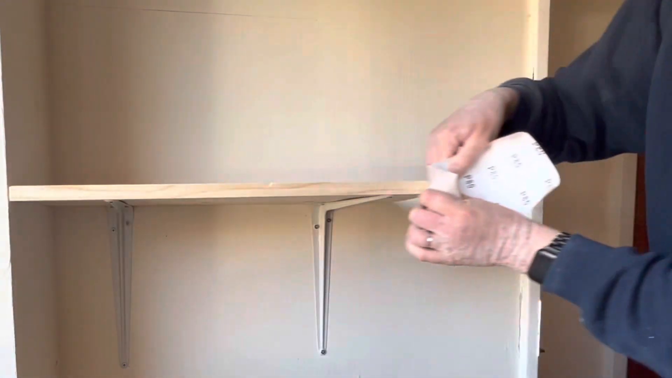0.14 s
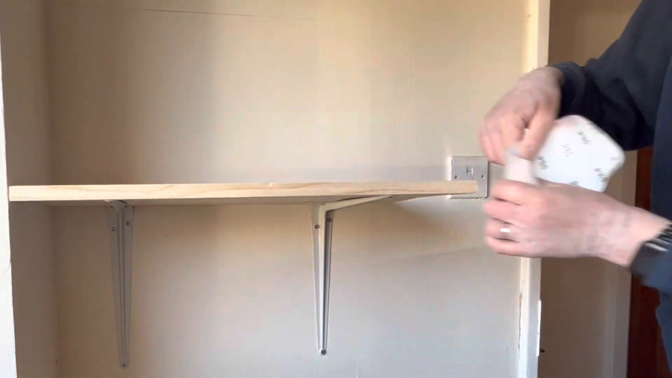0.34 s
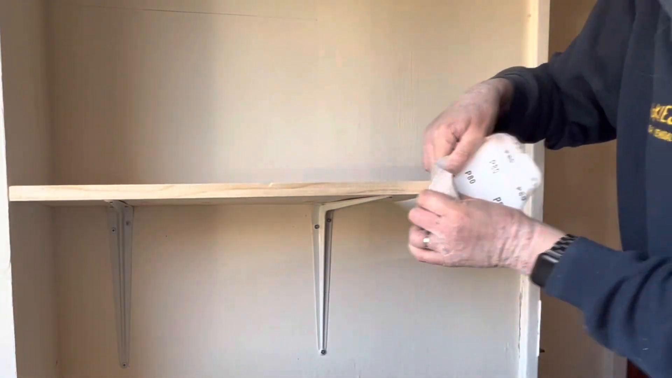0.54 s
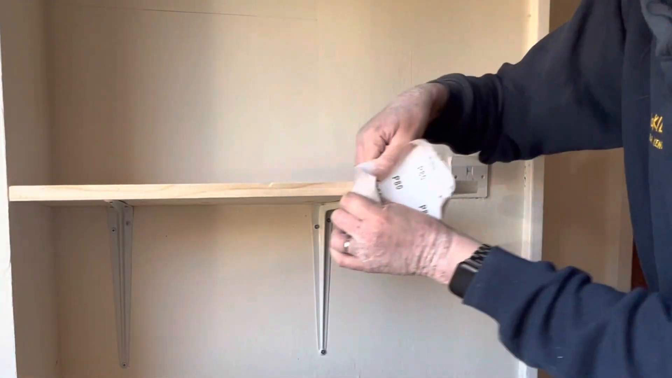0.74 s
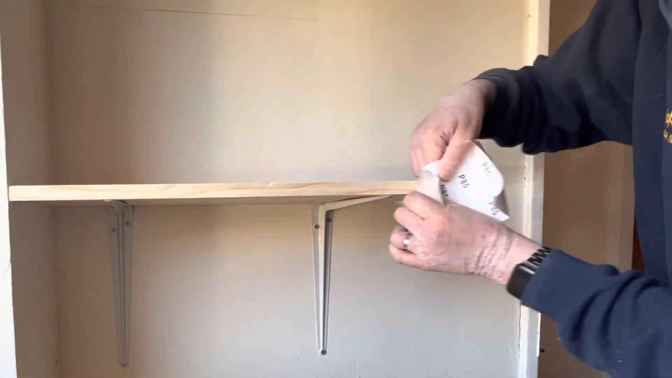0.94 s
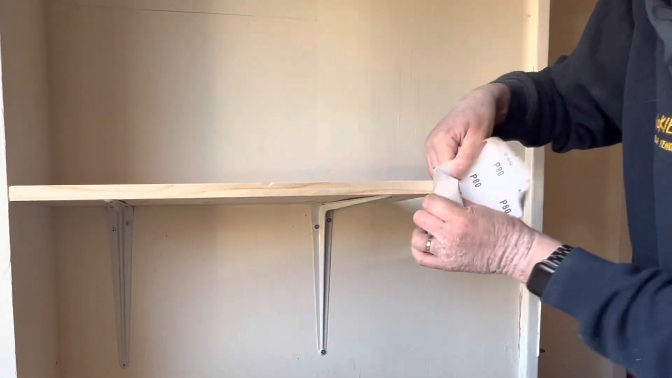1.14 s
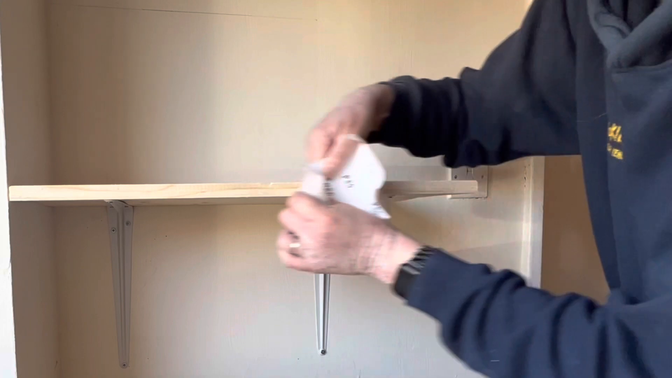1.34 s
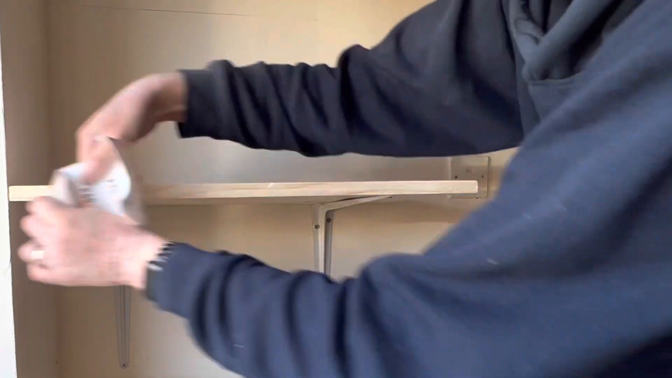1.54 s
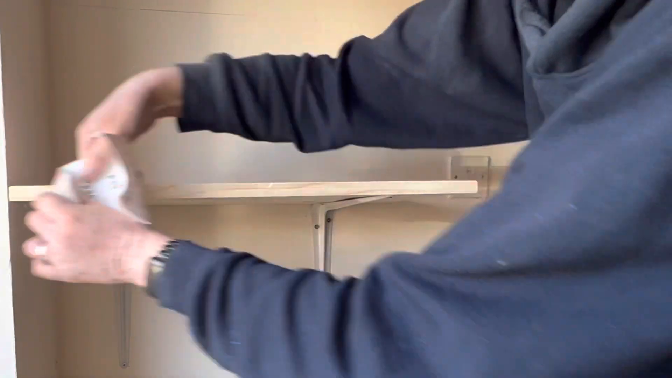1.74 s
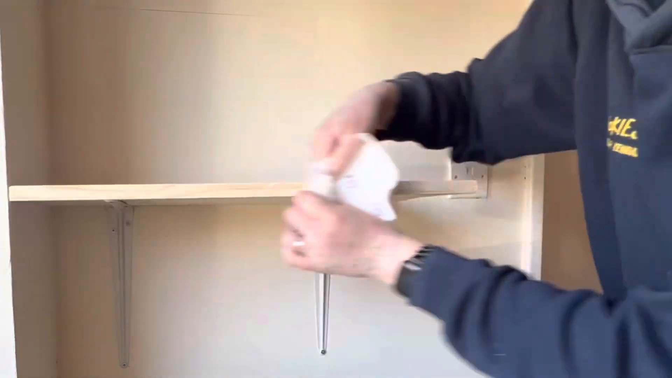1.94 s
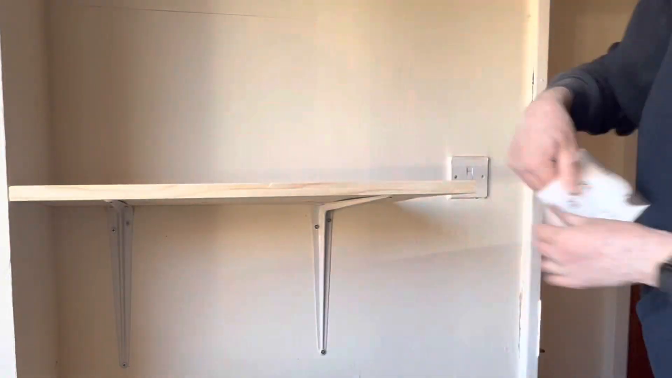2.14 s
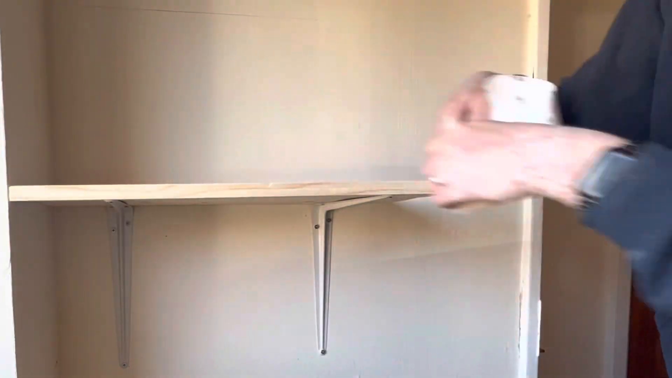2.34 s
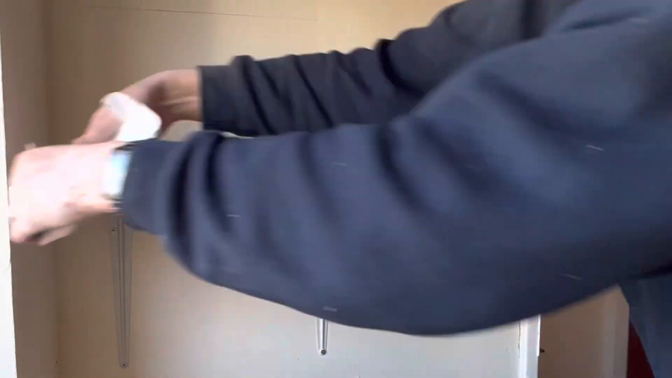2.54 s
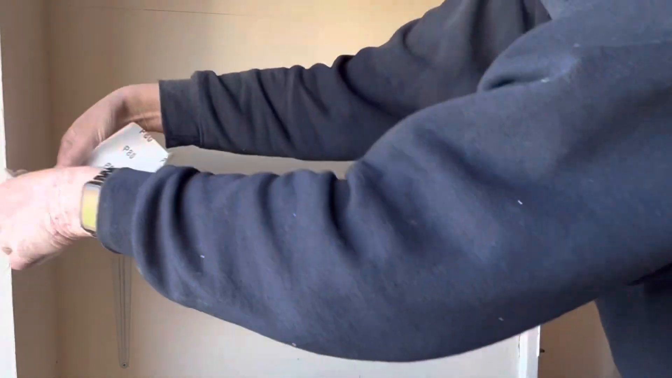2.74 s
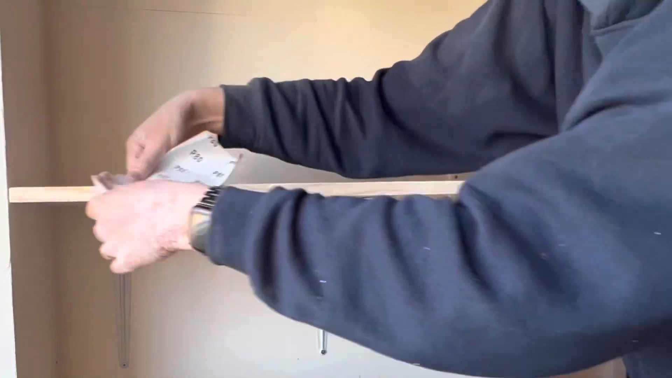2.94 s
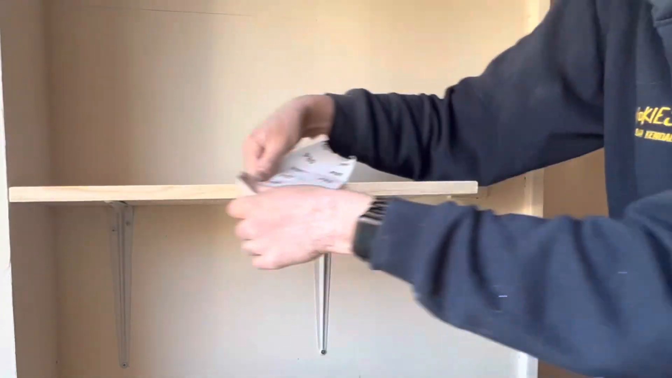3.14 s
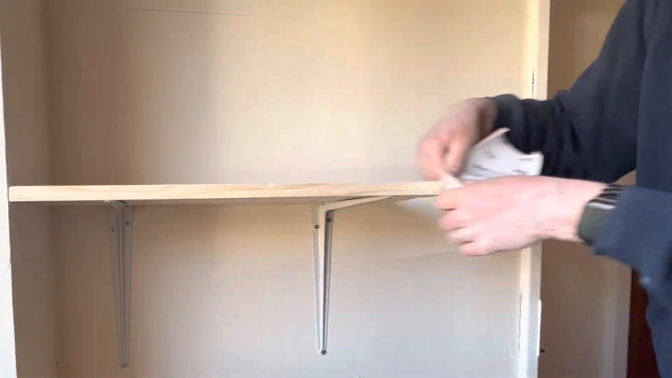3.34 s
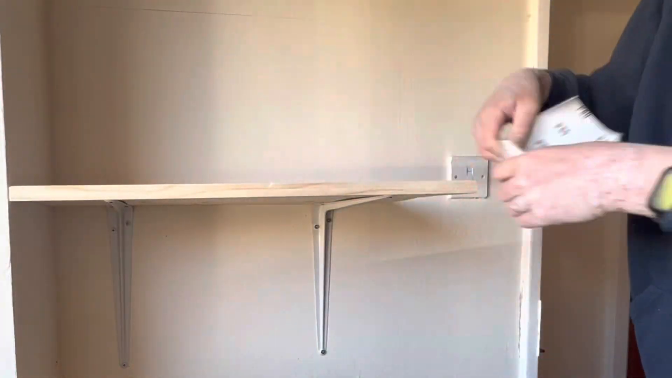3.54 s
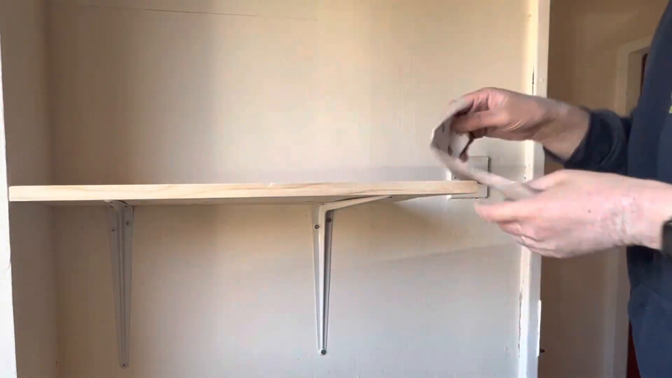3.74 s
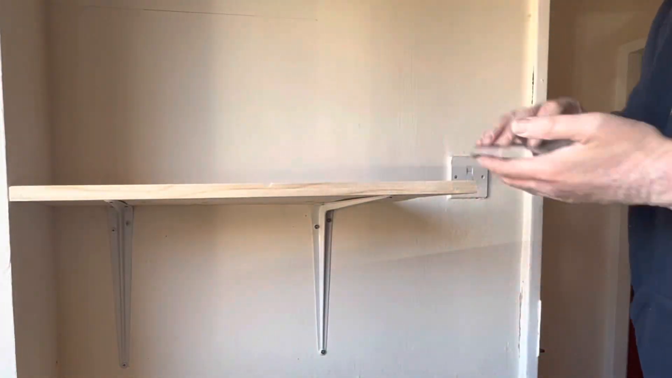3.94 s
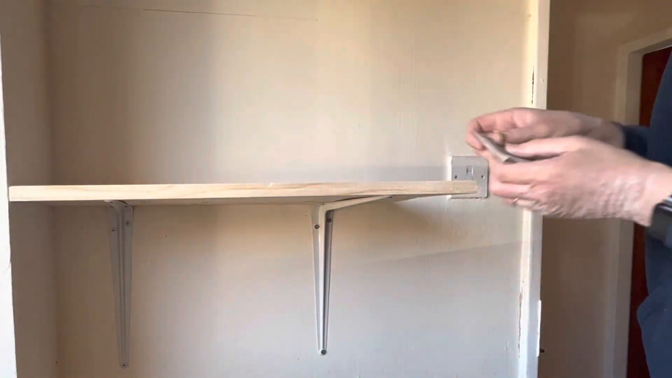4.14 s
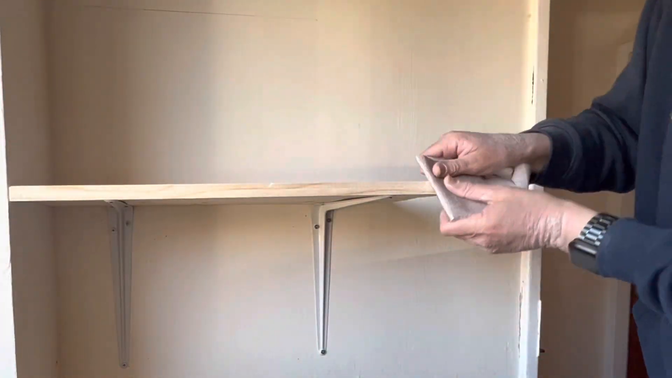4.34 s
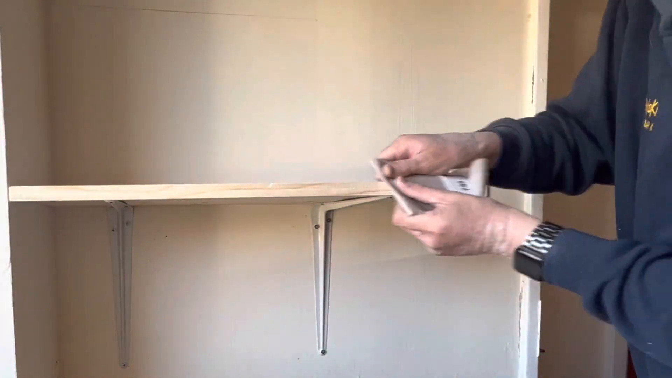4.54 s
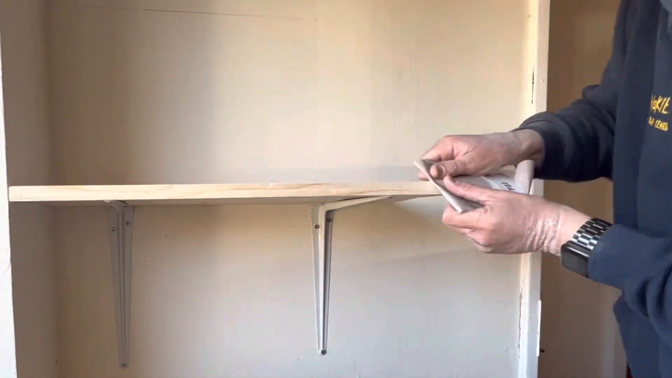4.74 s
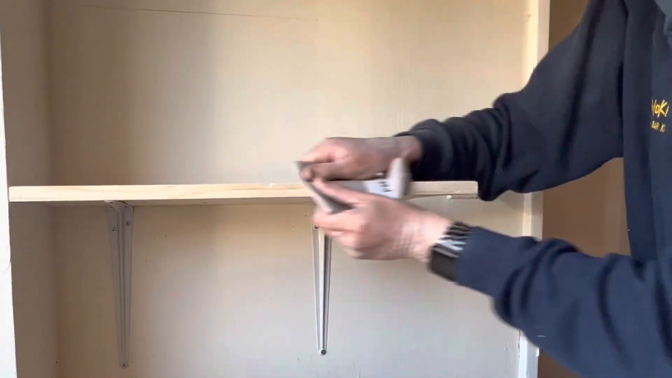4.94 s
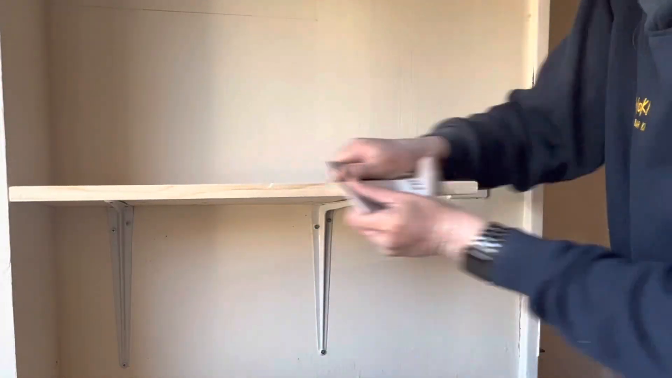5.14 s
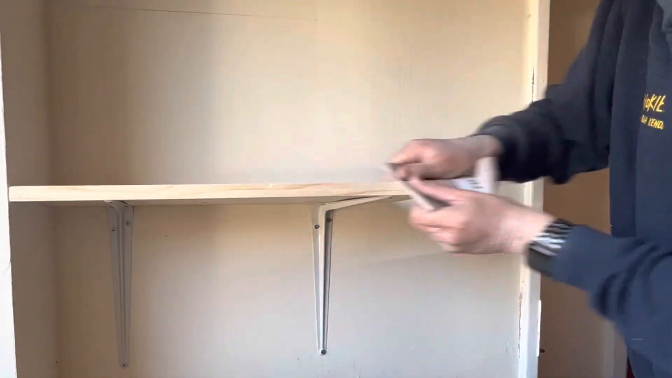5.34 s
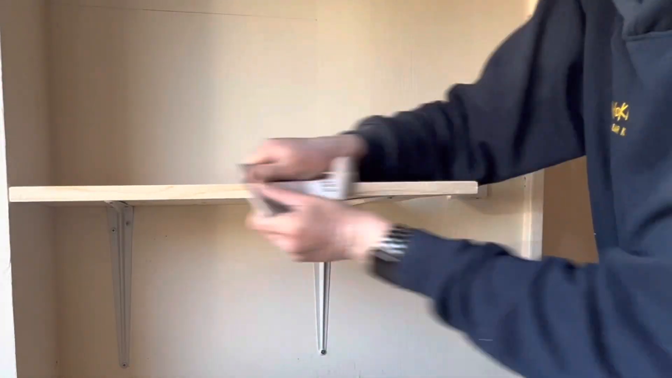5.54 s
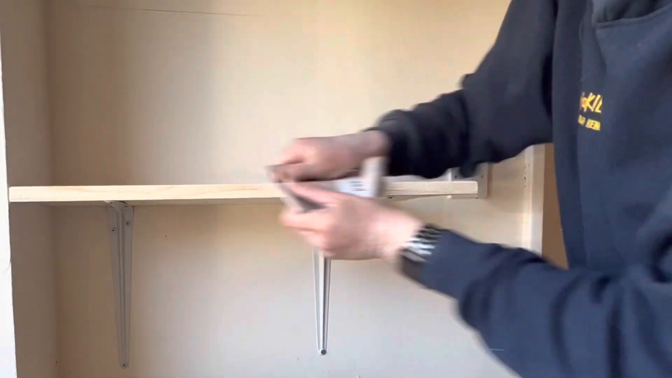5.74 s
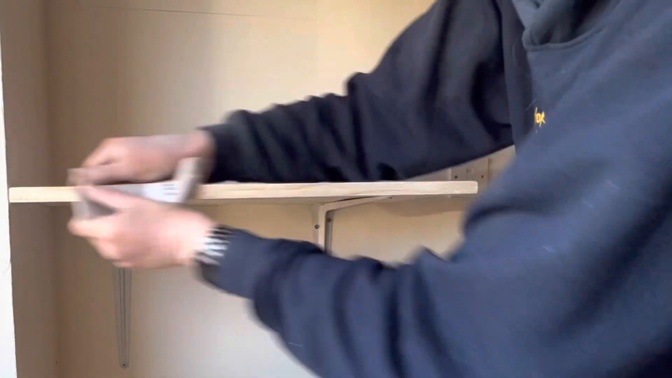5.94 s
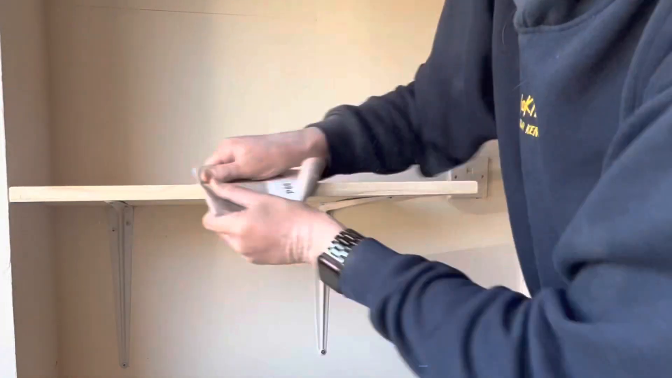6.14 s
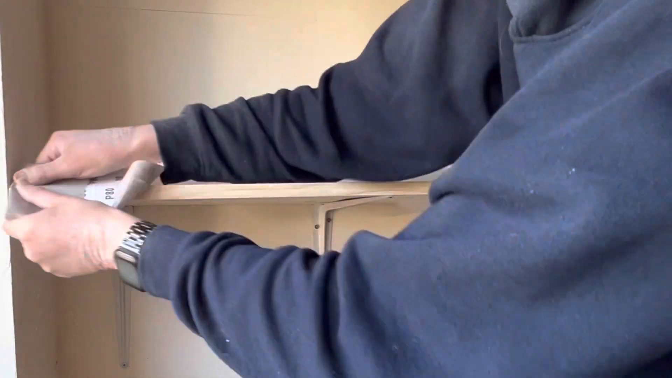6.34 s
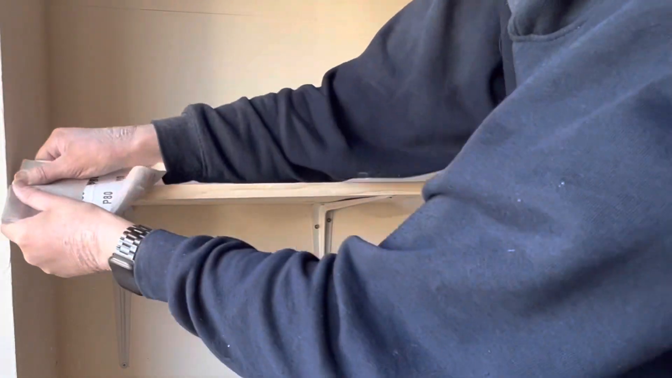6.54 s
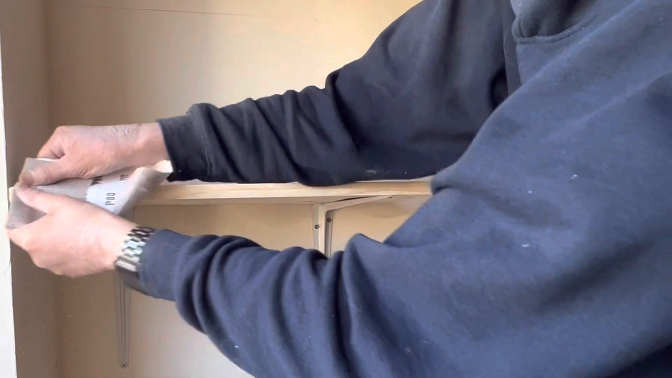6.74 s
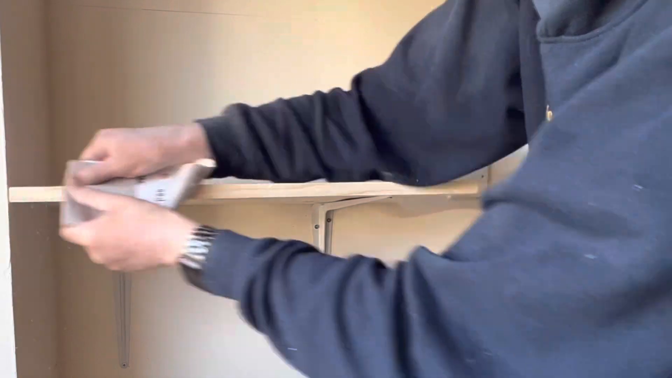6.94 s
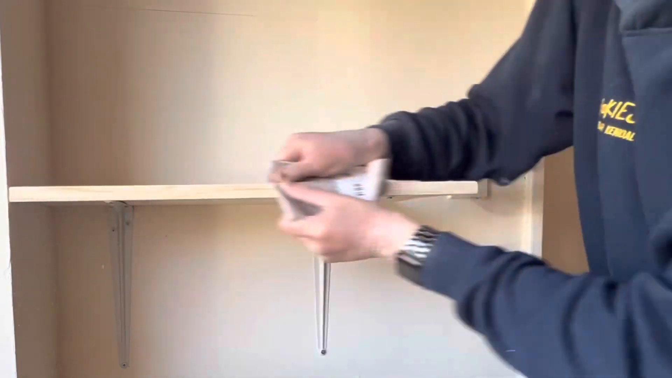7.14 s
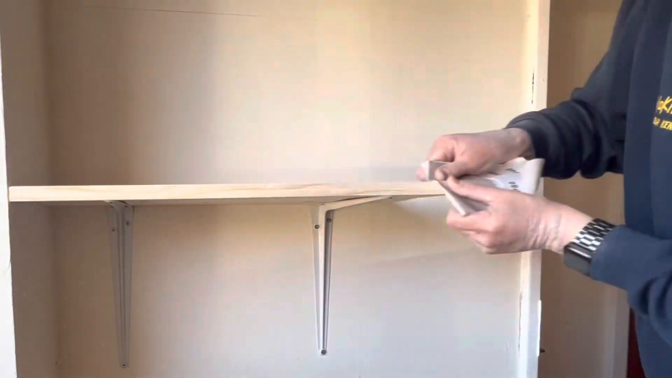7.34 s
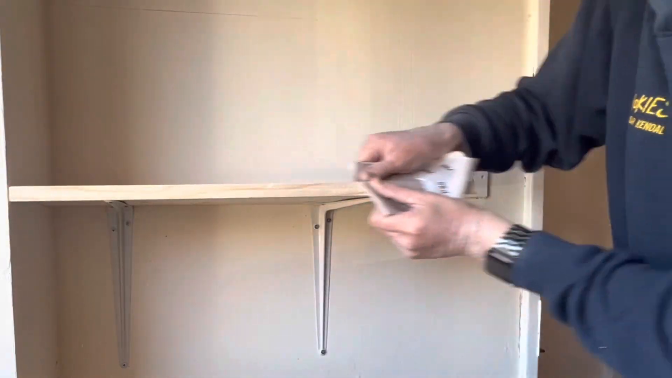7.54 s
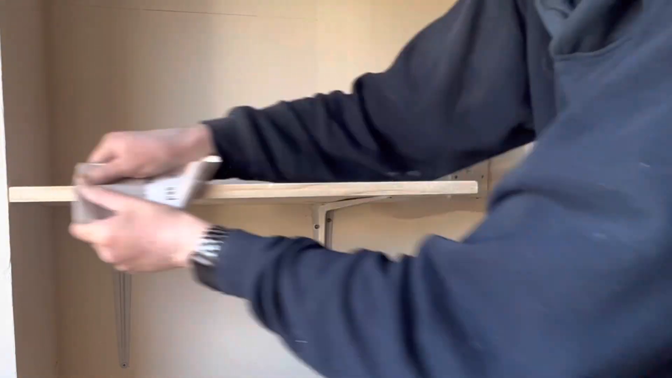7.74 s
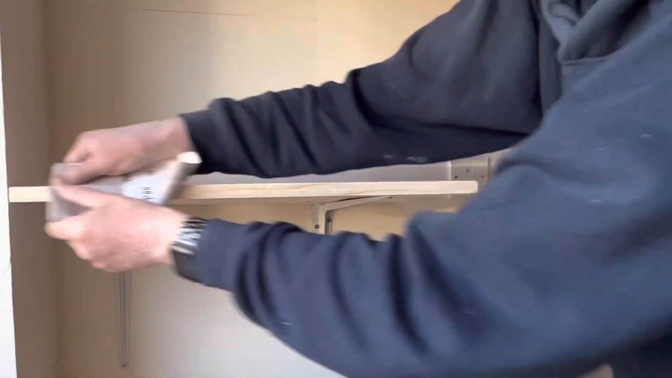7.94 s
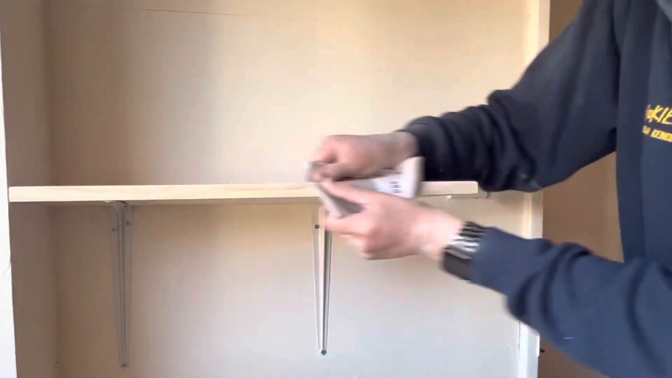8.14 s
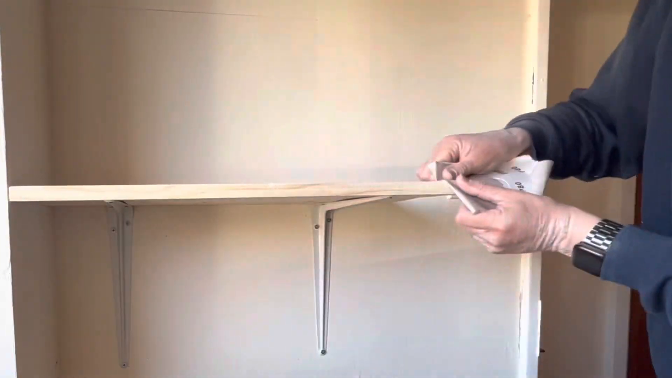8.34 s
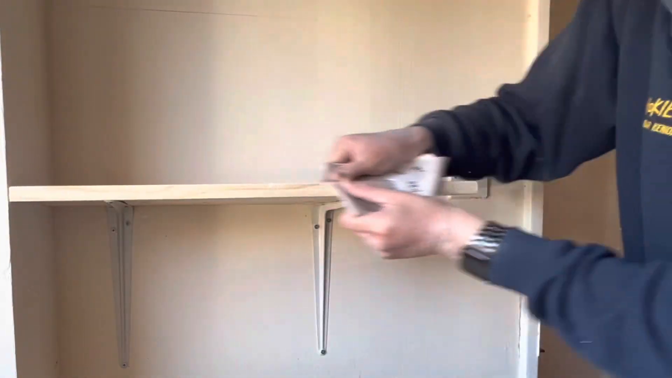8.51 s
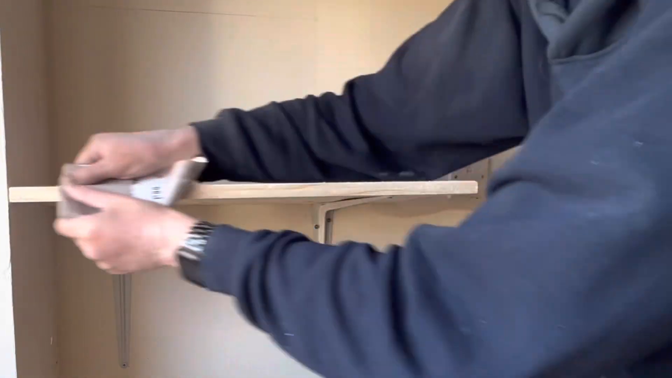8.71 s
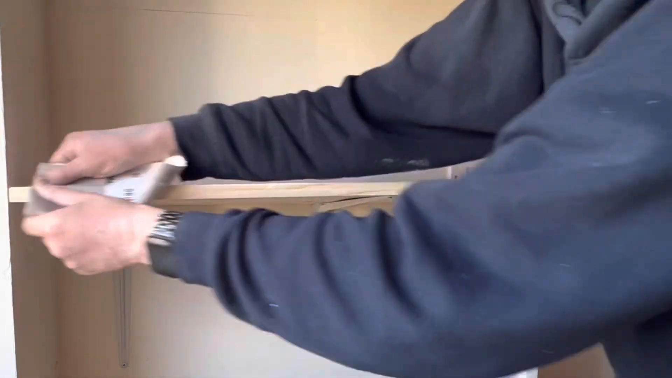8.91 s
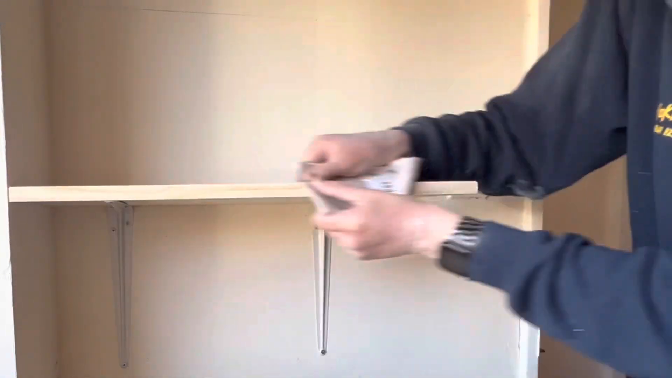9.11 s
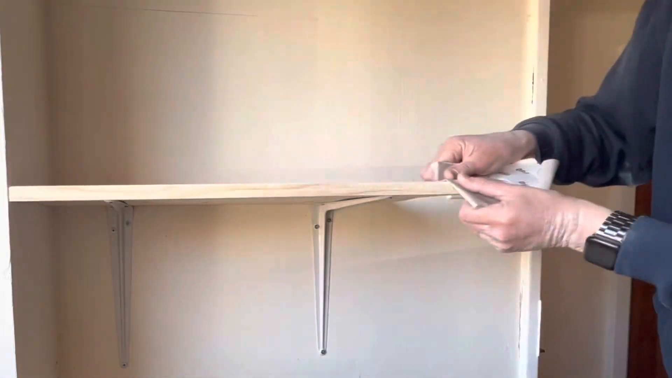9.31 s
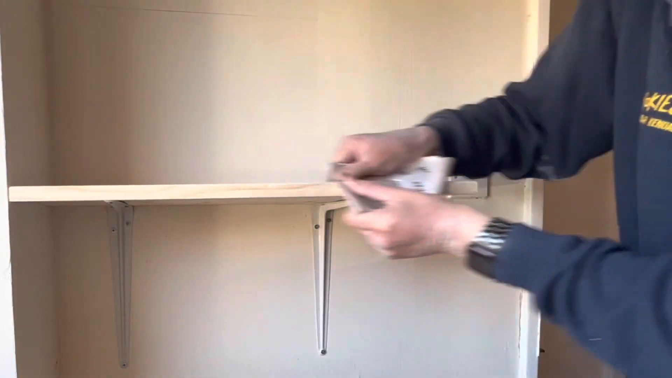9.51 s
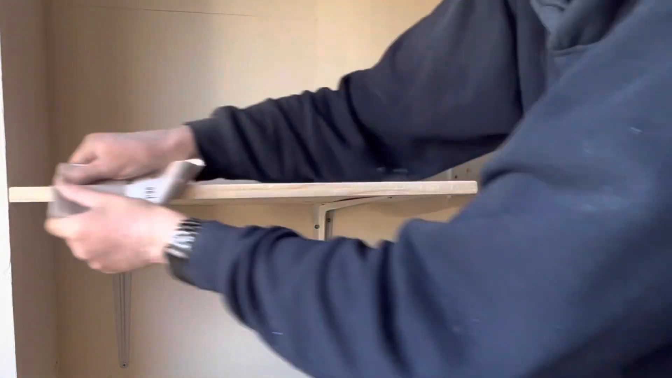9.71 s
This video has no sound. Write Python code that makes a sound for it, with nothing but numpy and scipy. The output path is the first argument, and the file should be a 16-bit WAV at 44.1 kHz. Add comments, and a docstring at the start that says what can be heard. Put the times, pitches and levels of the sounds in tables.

```python
"""In an alcove, a metre from a phone, sandpaper wrapped round the edge of a pine shelf is drawn to and fro by hand.
Scratches are noise grains, heard straight and through resonances of fold, shelf edge and drumming board.
Fingers and folds knock the board by short pushes; a steel bracket rings as decaying sines where the sheet snaps off.
Between strokes the loose sheet rustles in bands of crackle. Behind lie filtered room tone, a swaying low rumble
and the close walls' short echo; two microphone ports colour it all."""
import sys
import numpy as np
from scipy import signal
from scipy.fft import rfft, irfft, next_fast_len
from scipy.io import wavfile
from scipy.ndimage import uniform_filter1d

SR = 44100
rng = np.random.default_rng(int(sys.argv[2]) if len(sys.argv) > 2 else 0)


def wav_out(sig):
    """Save sig, one row per channel (or a flat mono array), as 16-bit PCM at SR to the path in sys.argv[1]."""
    wavfile.write(sys.argv[1], SR, np.round(np.clip(np.atleast_2d(sig).T, -1, 1) * 32767).astype(np.int16))


N = 430857

# Spectrum of grit on pine, for scratches and cracks. Each row: frequency in Hz, relative level in dB.
SCRATCH_SPECTRUM = [(290, -58), (500, -53), (1030, -3.5), (1200, -12), (1270, -6), (2230, 1.5), (3740, 0),
                    (4070, -2), (9930, -4), (14200, -6), (15500, -5)]
# Resonances of the board, the last one broad. Each row: frequency in Hz, width in Hz, relative gain in dB.
BOARD_MODES = [(127.8, 5.2, -13.5), (229, 12.8, -6), (274.4, 31, -3.5), (329, 52, -2), (394.2, 20.7, 4.5),
               (750, 1060, -13.5)]
# Resonances of the hollow in the folded sheet. Each row: frequency in Hz, width in Hz, relative gain in dB.
FOLD_MODES = [(840, 182, 7.5), (1270, 10, -3)]
# Rustles of the loose sheet. Each row: start in seconds, length in seconds, level in dB,
# crinkle pitch in Hz, crinkle level above the rustle in dB.
RUSTLE_TIMES = [(0.354, 0.056, -50, 2000, -5), (0.433, 0.035, -42, 2210, -1), (2.143, 0.14, -46, 890, -18),
                (2.24, 0.12, -50, 2500, -23), (2.29, 0.053, -47, 2980, -12), (2.42, 0.16, -53, 800, -3),
                (2.495, 0.12, -40.5, 2190, -17), (3.514, 0.098, -41.5, 3600, -20),
                (3.598, 0.071, -35.5, 3430, -8), (3.674, 0.19, -40, 4800, -11),
                (3.815, 0.092, -36.5, 1750, -9), (3.887, 0.1, -39, 2520, -12), (3.968, 0.18, -38, 4740, -5),
                (4.13, 0.098, -34, 2580, -15), (4.215, 0.14, -41.5, 900, -16),
                (7.39, 0.049, -43, 1500, -12)]


def undb(db):
    """Amplitude factor of a level in dB."""
    return 10 ** (np.asarray(db) / 20)


def level(x, db):
    """Scale a signal to an RMS level in dB."""
    return x * undb(db) / np.sqrt(np.mean(x ** 2))


def high_pass(x, order, hz):
    """Butterworth high-pass."""
    return signal.sosfilt(signal.butter(order, hz, "high", fs=SR, output="sos"), x)


def curves(rows):
    """Columns of a time table, one value a sample."""
    s, *columns = np.transpose(rows)
    return [np.interp(np.arange(N) / SR, s, column) for column in columns]


def colour(x, points, scale=1):
    """Filter by (Hz, dB) points joined along log frequency; scale multiplies the dB."""
    size = next_fast_len(N)
    hz, db = np.transpose(points)
    f = np.arange(size // 2 + 1) * SR / size + 1  # 1 Hz up, to keep the log finite
    gain = undb(scale * np.interp(np.log(f), np.log(hz), db))
    return irfft(rfft(x, size) * gain, size)[..., :N]


def walk(rate):
    """Random levels joined by slopes of 1 / rate s; spread a little below 1."""
    k = int(SR / rate)
    steps = np.repeat(rng.standard_normal(N // k + 1), k)
    return uniform_filter1d(steps, k)[:N]


def ring(x, modes, flicker_db=0.0):
    """Parallel resonances, neighbours in opposite phase; each may flicker, as when the contact moves."""
    out = 0
    for k, (hz, width, db) in enumerate(modes):
        gain = (-1) ** k * undb(db + flicker_db * walk(12))
        out = out + gain * signal.lfilter(*signal.iirpeak(hz, hz / width, SR), x)
    return out


def grit(scatter_db, channels):
    """Countless grain scratches of uneven size: noise with a random gain on each sample."""
    size_db = scatter_db * np.minimum(rng.exponential(size=(channels, N)), 5.0)
    return level(rng.standard_normal((channels, N)) * undb(size_db), 0)


def pair(x, alike_hz=800, size=4):
    """Two ports from three rows: the bass is common, size samples later at the right; the treble differs."""
    low = signal.butter(2, alike_hz, "low", fs=SR, output="sos")
    common = signal.sosfilt(low, x[0])
    return np.array([common, np.roll(common, size)]) + high_pass(x[1:], 2, alike_hz)


def glide(s, length):
    """Samples, time since the start and hand speed 0-1: speeding up, gliding, slowing."""
    ramp_limit = 0.34 * length  # keeps short strokes from being all ramp
    speed_up_s, slow_down_s = min(0.12, ramp_limit), min(0.079, ramp_limit)
    i = np.arange(max(int(s * SR), 0), min(int((s + length) * SR), N))
    t = i / SR - s
    speed = np.clip(np.minimum(t / speed_up_s, (length - t) / slow_down_s), 0, 1)
    return i, t, speed


def bend(x, patchy_db):
    """The bending sheet brightens and dulls in drifting patches, some 40 ms by 250 Hz."""
    spectrum = signal.stft(x, nperseg=512)[2]
    patches = rng.standard_normal(spectrum.shape[1:])
    patches = uniform_filter1d(patches, size=3, axis=0)  # along frequency
    patches = uniform_filter1d(patches, size=7, axis=1)  # along time
    return signal.istft(spectrum * undb(patchy_db * patches / patches.std()), nperseg=512)[1][:, :N]


def room_tone():
    """Steady air of the room: noise filtered to a fixed spectrum."""
    # Spectrum of the room. Each row: frequency in Hz, relative level in dB.
    tone_spectrum = [(60, -6), (300, 6), (900, -14), (2500, -5), (15000, -3)]
    return level(colour(pair(rng.standard_normal((3, N))), tone_spectrum), -63)


def rumble(drum_db):
    """Two low resonances of noise, swaying at random and partly following the drumming."""
    sway_db, follow = 2, 0.11  # follow: share of the board's dB changes
    low = ring(pair(rng.standard_normal((3, N)), alike_hz=470), [(73, 12, -31), (119.6, 28, 14)])
    slow_db = uniform_filter1d(drum_db, SR // 8)
    return level(low, -59.5) * undb(sway_db * walk(6.8) + follow * (slow_db - slow_db.mean()))


def alcove(x):
    """Short dense echo of the close plaster walls: decaying noise, softened in the treble."""
    t60_s, echo_db = 0.15, -12
    t = np.arange(int(.5 * SR)) / SR
    echo = np.zeros((3, N))
    # the first return comes after 3 ms
    echo[:, :len(t)] = rng.standard_normal((3, len(t))) * undb(-60 * t / t60_s) * (t > .003)
    echo = signal.lfilter([1], [1, -.4], pair(echo)[:, :len(t)])
    echo = echo / np.sqrt(np.sum(echo ** 2, axis=1, keepdims=True))
    return undb(echo_db) * signal.fftconvolve(x, echo, axes=1)[:, :N]


def bracket():
    """Three decaying sines of the steel bracket, set ringing by each snap."""
    # Modes of the bracket. Each row: frequency in Hz, time to fall 60 dB in seconds.
    steel_modes = [(163, .56), (364, .25), (505, .5)]
    # The sheet slips off the shelf end. Each row: time in seconds, ring level in dB,
    # level of the two lower modes against the highest in dB.
    snap_times = [(.262, -47, -14), (2.123, -37, -14), (3.415, -31.5, -7)]
    out, t = np.zeros(N), np.arange(SR) / SR
    onset = 1 - np.exp(-t / 0.0088)
    low, middle, high = (undb(-60 * t / t60) * np.sin(2 * np.pi * hz * t) * onset for hz, t60 in steel_modes)
    for s, db, low_db in snap_times:
        i = int(s * SR)
        out[i:i + SR] += undb(db) * (high + undb(low_db) * (low + middle))
    return out


def papery_crack(noise, db, crack_db):
    """A burst of low-passed noise; weaker cracks are duller, slower scuffs."""
    t = np.arange(noise.shape[1]) / SR
    cutoff_hz = min(12400 * 2 ** (0.32 * crack_db), 16000)
    rise_s, fall_s = .0007 * 2 ** (-.12 * crack_db), .0055 * 2 ** (-.05 * crack_db)
    dulled = signal.lfilter(*signal.butter(2, cutoff_hz, fs=SR), noise)
    return (1.5 - np.exp(-t / rise_s)) * level(dulled, db + crack_db) * np.exp(-t / fall_s)


def knocks():
    """Each knock is a short push and a few ms of rattle into board and fold, with a papery crack."""
    # Knocks on the board. Each row: time in seconds, relative strength in dB, crack against that strength in dB,
    # drive of the fold against that of the board in dB.
    knock_times = [(0.254, -14, -12.5, -2), (0.372, -35, -10, 10), (0.439, -14, -16, -1),
                   (0.543, -15, -26, -2), (0.572, -4.5, -25, -7.5), (0.601, -10.5, -30, -6),
                   (0.924, -5.5, -24, -5), (0.974, -6.5, -30, -11), (1.004, -15, -30, -10),
                   (1.112, -12, -28, -6), (1.188, -28, -10, -6), (1.247, -9.5, -28, -7),
                   (1.695, -17.5, -15, 4), (2.118, -16.5, -8, 5), (2.221, -31, -28, 1),
                   (2.314, -50, -7, 10), (2.515, -45, -7, 1), (2.567, -32, -9.5, 7.5), (2.64, -20, -16, -6),
                   (2.695, -25, -0.5, -13), (2.721, -7.5, -15, -4), (2.862, -9.5, -16.5, -13),
                   (3.318, -20.5, -9.5, 5), (3.405, -11, -11, -9), (3.708, -41.5, -12, 18.5),
                   (3.783, -19.5, -12.5, 8.5), (3.818, -31, -24, 12), (4.011, -39, -4, 14),
                   (4.284, -20.5, -13.5, 3.5), (4.384, -25, -9.5, 11.5), (4.442, -16.5, -20, 4.5),
                   (4.484, -12.5, -22, 2.5), (4.494, -18.5, -6.5, 5), (4.543, -19, -24, 3),
                   (6.022, -12.5, -30, -12), (6.309, -16, -25, -17.5), (6.374, -9, -23, -6),
                   (6.431, -26, -11, -2), (6.587, -29.5, -8, -6), (6.6, -16, -28, -3.5),
                   (6.886, -29, -11, 2), (7.402, -28.5, -13, 7), (8.751, -14.5, -34, -10),
                   (8.801, -10, -34, -9), (9.385, -38.5, 3, 15.5)]
    t = np.arange(2048) / SR
    thud, tap, crack = np.zeros((3, N)), np.zeros((3, N)), np.zeros((2, N))
    push = t / 0.0013 * np.exp(1 - t / 0.00052)
    rattle_shape = np.exp(-t / 0.0077) * (1 - np.exp(-t / 0.0039))
    for s, db, crack_db, fold_db in knock_times:
        i = int(s * SR)
        chance = rng.standard_normal((5, len(t)))
        blow = undb(db) * (push + 0.5 * chance[:3] * rattle_shape)
        thud[:, i:i + len(t)] += blow
        tap[:, i:i + len(t)] += undb(fold_db) * blow
        crack[:, i:i + len(t)] += papery_crack(chance[3:], db, crack_db)
    # the hand on the board damps its ring
    held = [(hz, 1.4 * width, db) for hz, width, db in BOARD_MODES]
    body = undb(9.5) * ring(thud, held) + undb(8.0) * ring(tap, FOLD_MODES)
    return pair(body) + undb(11.0) * colour(crack, SCRATCH_SPECTRUM)


def crinkles():
    """Each rustle bends the sheet its own way, so a patch of crackle stands out at its own pitch."""
    width_share = 0.14  # of the pitch
    out = np.zeros((2, N))
    grains = grit(scatter_db=4, channels=2) * undb(3.5 * walk(120))
    for s, length, db, hz, crinkle_db in RUSTLE_TIMES:
        i, t, speed = glide(s, length)
        patch = signal.lfilter(*signal.iirpeak(hz, 1 / width_share, SR), grains[:, i])
        out[:, i] += level(patch, db + crinkle_db) * speed
    return out


def hand():
    """Scratch and drum levels in dB from the speed of the hand in each stroke and rustle."""
    # Strokes along the edge; quick ones overlap at the turn. Each row: start in seconds, length in seconds,
    # early scratch level in dB, late scratch level in dB, drumming of the board above the scratch in dB.
    stroke_times = [(-.1, 0.42, -23.5, -28, -18), (0.515, 0.24, -25.5, -25, -13.5),
                    (0.759, 0.13, -25.5, -25.5, -13.5), (0.901, 0.15, -37, -19, -11.5),
                    (1.046, 0.12, -27.5, -29, -14), (1.174, 0.48, -22.5, -24.5, -16),
                    (1.674, 0.5, -24.5, -21.5, -16.5), (2.629, 0.18, -33.5, -28.5, -5.5),
                    (2.755, 0.7, -29.5, -24.5, -13.5), (4.273, 0.091, -36.5, -33, -6.5),
                    (4.352, 0.081, -36, -39.5, -9), (4.404, 0.25, -28.5, -21, -14),
                    (4.646, 0.14, -27, -23, -19), (4.784, 0.17, -24.5, -24, -15),
                    (4.943, 0.15, -24.5, -28, -17.5), (5.084, 0.17, -27.5, -25.5, -16.5),
                    (5.243, 0.18, -29, -28, -16), (5.416, 0.27, -27.5, -31.5, -16.5),
                    (5.658, 0.16, -32.5, -32.5, -12), (5.809, 0.25, -30.5, -31, -14.5),
                    (6.035, 0.16, -30.5, -28.5, -14.5), (6.179, 0.23, -28.5, -28.5, -14.5),
                    (6.409, 0.089, -28, -34.5, -12), (6.493, 0.093, -31, -29.5, -12.5),
                    (6.585, 0.076, -26.5, -41.5, -9), (6.657, 0.085, -31, -36, -9.5),
                    (6.742, 0.068, -31.5, -33.5, -10.5), (6.811, 0.065, -32.5, -30.5, -11),
                    (6.876, 0.51, -21.5, -25, -18.5), (7.427, 0.44, -23, -26.5, -16.5),
                    (7.881, 0.47, -26.5, -27, -17), (8.366, 0.45, -25.5, -27, -17),
                    (8.867, 0.49, -24.5, -29, -16.5), (9.368, 0.43, -25, -25, -17)]
    rest_db, rest_drum_db = -69, -79  # with the hand still
    rustle_fade_db, rustle_drum_db = -3, -17.5  # fade through a rustle; board above a rustle
    scratch_power, drum_power = 0.64, 0.39  # amplitude grows with hand speed to these powers
    bite_db, bite_s = 5.5, 0.054  # the board drums harder as the grit first bites
    linger_db, linger_s = -18.5, 0.16  # the slack sheet whispers on around each turn
    rub, drum = np.full(N, undb(rest_db) ** 2), np.full(N, undb(rest_drum_db) ** 2)
    rustles = [(s, length, db, db + rustle_fade_db, rustle_drum_db) for s, length, db, *_ in RUSTLE_TIMES]
    for s, length, early_db, late_db, above_db in stroke_times + rustles:
        i, t, speed = glide(s, length)
        db = early_db + (late_db - early_db) * t / length
        board_db = db + above_db + bite_db * np.exp(-t / bite_s)
        # powers add where strokes overlap
        rub[i] += (undb(db) * speed ** scratch_power) ** 2
        drum[i] += (undb(board_db) * speed ** drum_power) ** 2
    rub = rub + undb(linger_db) ** 2 * np.abs(uniform_filter1d(rub, int(linger_s * SR)))
    return 10 * np.log10(rub), 10 * np.log10(drum)


def sanding(rub_db, drum_db):
    """Scratches heard straight and through the sheet, the shelf edge, the fold and the whole board."""
    # How the sheet is held. Each row: time in seconds, fine hiss in dB, gain of the fold in dB,
    # gain of the lowest edge mode in dB, all relative.
    grip = [(0.0, -4, 8, 11), (1.85, -2.5, -3, 2), (2.28, -5, 9, -8), (3.15, -3, 5.5, 2),
            (3.9, 7.5, 15, -5), (4.3, 6, 11, 5), (4.55, -11.5, 13, 14), (4.7, -1.5, 5, 9),
            (5.3, 7.5, 13.5, 7), (5.82, 13, 10.5, 8), (6.5, 0.5, 4, -7), (6.94, -4, 4.5, 3),
            (7.92, 4, 7.5, 1), (9.77, 1, 3.5, 6.5)]
    # Resonances of the shelf edge. Each row: frequency in Hz, width in Hz, relative gain in dB.
    edge_modes = [(1747, 72, 0.5), (2254, 10, 9), (3080, 20, -12), (3140, 26, 8.5), (3667, 67, 13.5)]
    pan_db = -0.3  # left minus right
    fine_db, fold_db, edge_db = curves(grip)
    grains = pair(grit(scatter_db=1.5, channels=3), alike_hz=1630)
    grains = grains * undb(0.61 * walk(40) + 0.5 * walk(200))
    # a loosely held sheet crackles: the quieter the rub, the more it comes in bursts
    grains = grains * undb(np.clip(-.2 * (rub_db + 28.5), 0, 3.0) * walk(90))

    scratch = level(colour(bend(grains, patchy_db=2.5), SCRATCH_SPECTRUM), 0)
    # faster strokes tear finer, so the treble grows quicker than the level
    treble_db = fine_db + 0.59 * np.maximum(rub_db + 30.0, -8.0)
    scratch = scratch + (undb(treble_db) - 1) * high_pass(scratch, 1, 5000)

    upper_edge = ring(grains, edge_modes[1:], flicker_db=3)
    lowest_edge = undb(edge_db) * ring(grains, edge_modes[:1], flicker_db=3)
    edge = level(upper_edge + lowest_edge, -12)
    fold = level(ring(grains, FOLD_MODES, flicker_db=3.0), -28) * undb(fold_db)

    drum = grit(scatter_db=3.0, channels=3)
    *modes, broad = BOARD_MODES
    board = ring(drum, modes, flicker_db=2.0) - ring(drum, [broad])
    board = level(pair(board), 0) * undb(1.93 * walk(25))
    rub_gain = undb(rub_db + np.array([[pan_db], [-pan_db]]) / 2)
    return rub_gain * (scratch + edge + fold) + undb(drum_db) * board


def scene():
    """Sanding, rustles and knocks near the phone, with their echo, the bracket, room tone and rumble."""
    rub_db, drum_db = hand()
    near = sanding(rub_db, drum_db) + crinkles() + knocks()
    # only sound above about 600 Hz is echoed
    walls = alcove(high_pass(near, 2, 600))
    return near + walls + bracket() + room_tone() + rumble(drum_db)


def record(dry):
    """The two ports favour different bands and share a narrow dip; the bass falls away, the top rolls off and is cut."""
    # Tilt between the microphone ports. Each row: frequency in Hz, gain at the left port in dB;
    # the right port takes 1.52 times the opposite.
    port_tilt = [(250, 0), (380, 0.5), (700, -2), (1290, 0.5), (2380, 1), (4400, -0.5), (8120, 1.5),
                 (10500, 4), (15000, 1)]
    # Treble roll-off. Each row: frequency in Hz, gain in dB.
    top_rolloff = [(14600, 0), (15000, -20)]
    notch_hz, notch_width_hz, notch_depth = 10650, 420, .7  # depth as a share of the amplitude
    x = np.array([colour(dry[0], port_tilt, 1.0), colour(dry[1], port_tilt, -1.52)])
    x = high_pass(x, 2, 65)
    x = x - notch_depth * signal.lfilter(*signal.iirpeak(notch_hz, notch_hz / notch_width_hz, SR), x)
    x = colour(x, top_rolloff)
    return signal.sosfilt(signal.ellip(12, .2, 80, 15700, fs=SR, output="sos"), x)


dry = scene()
out = record(dry)
wav_out(out)
```